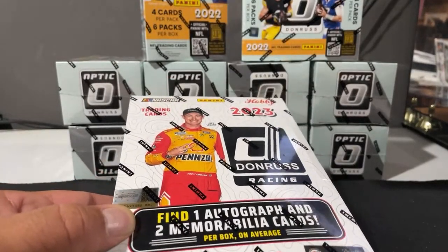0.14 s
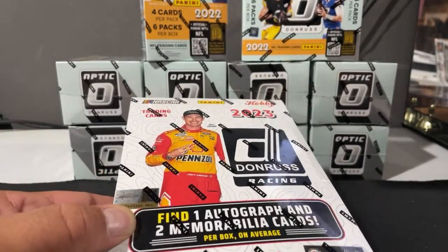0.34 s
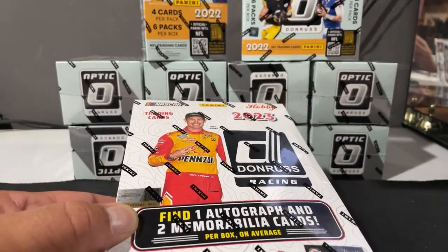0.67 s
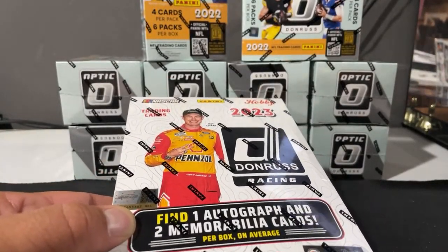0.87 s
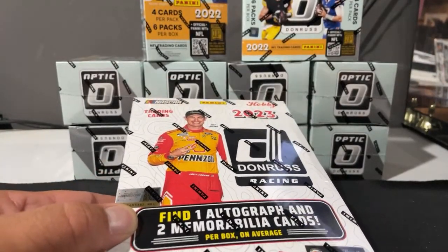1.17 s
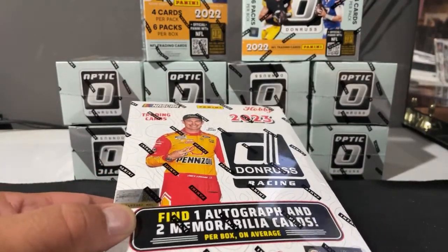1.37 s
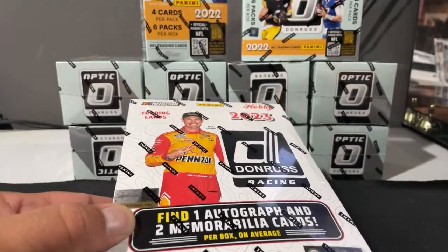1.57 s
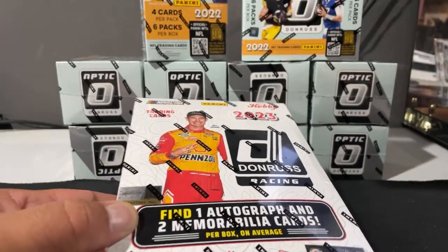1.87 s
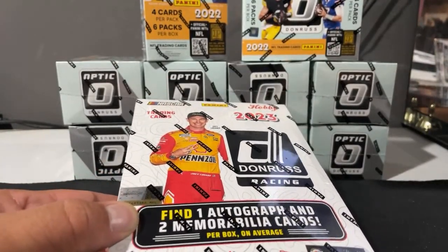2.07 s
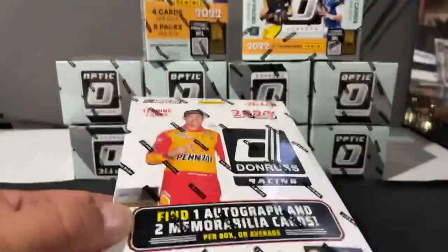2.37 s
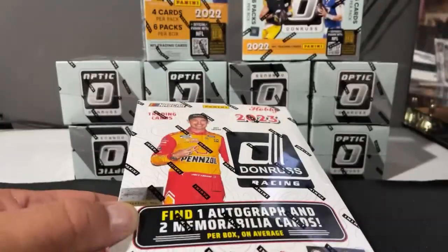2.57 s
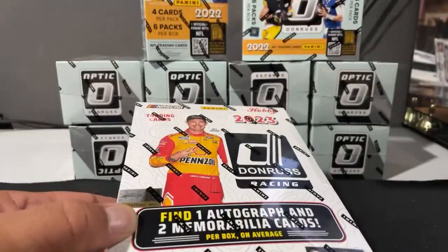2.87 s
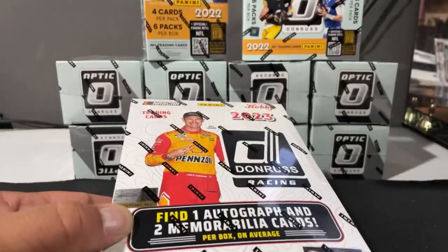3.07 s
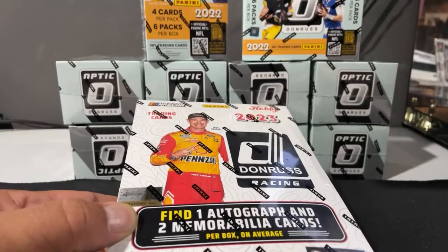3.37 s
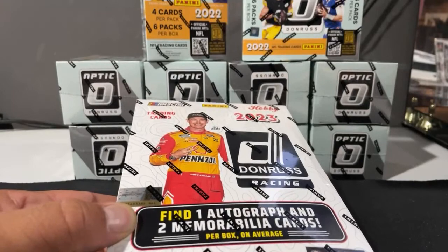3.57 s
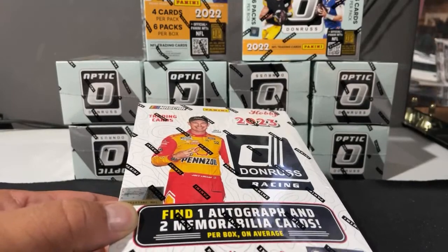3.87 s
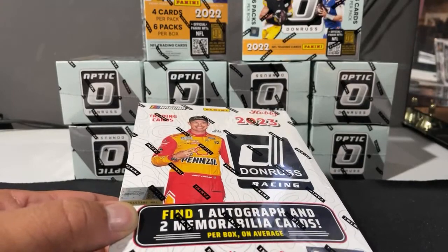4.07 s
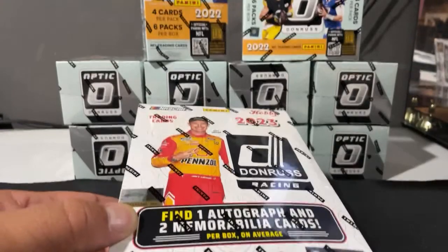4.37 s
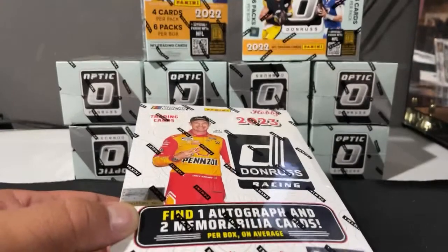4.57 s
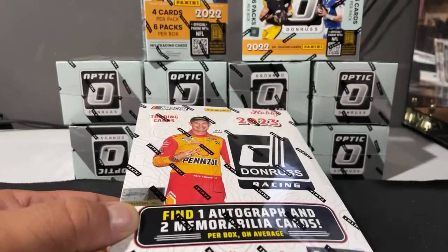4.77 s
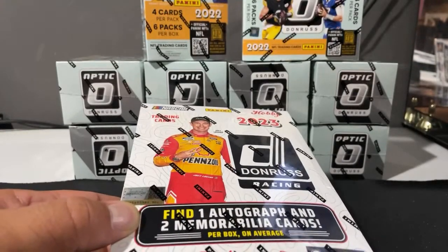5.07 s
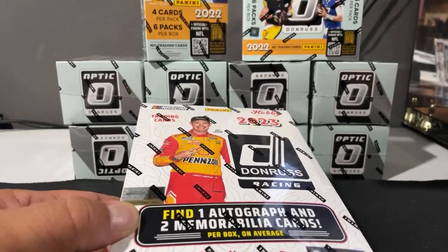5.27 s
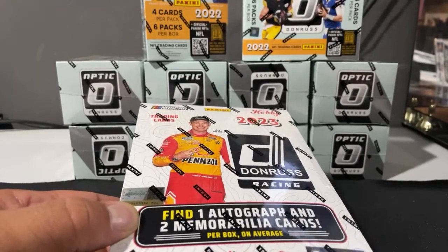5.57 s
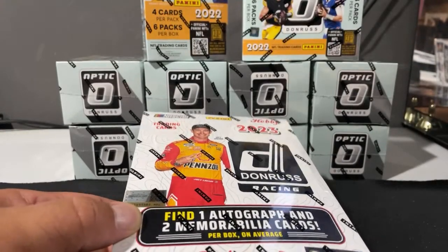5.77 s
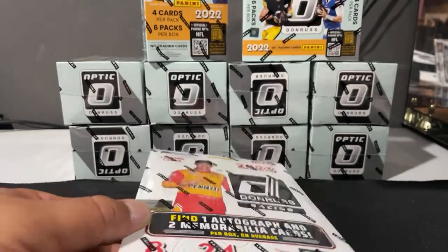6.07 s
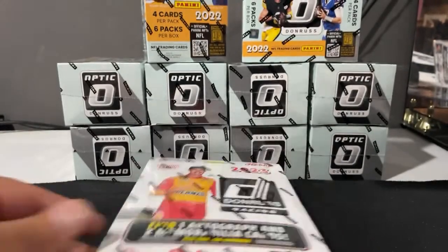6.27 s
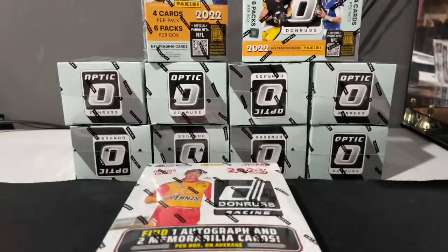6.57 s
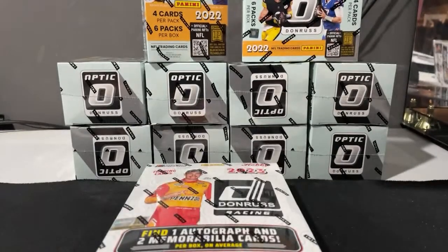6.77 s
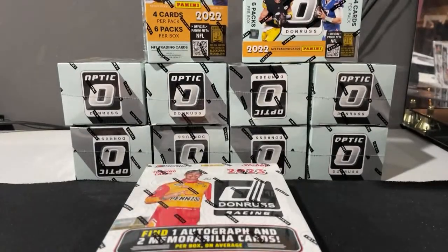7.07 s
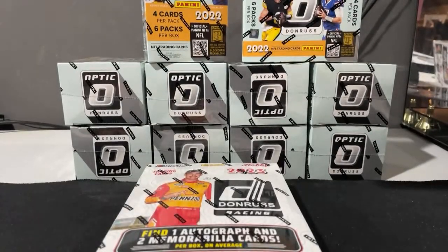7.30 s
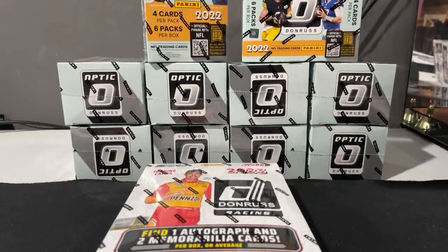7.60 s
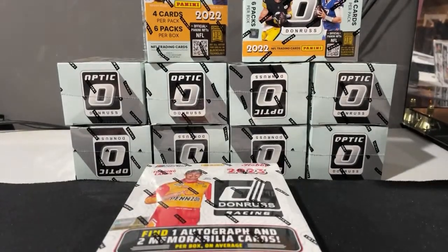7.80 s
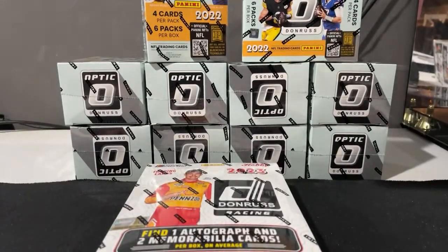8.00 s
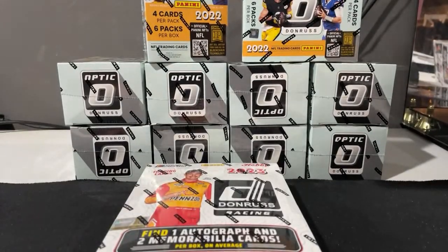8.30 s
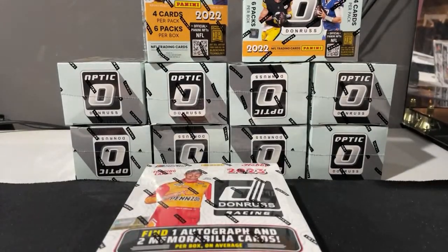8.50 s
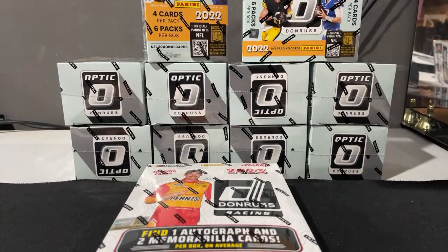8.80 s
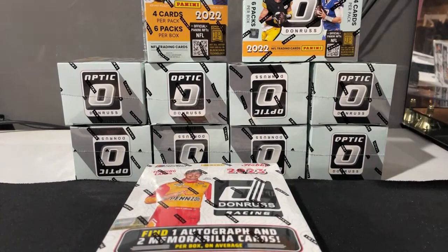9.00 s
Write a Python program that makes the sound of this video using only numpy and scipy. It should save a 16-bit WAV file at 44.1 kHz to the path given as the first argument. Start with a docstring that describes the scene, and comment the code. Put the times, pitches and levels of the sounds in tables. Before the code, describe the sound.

A hand handles a shrink-wrapped cardboard box at a desk, close to the microphone in a small, quiet room. Faint rubbing and soft knocks lead to a hard, slapping thump. Light taps and low, juddering scrapes follow, with a brief squeak. Then come two quick thumps and another about a second later. A duller bump and a few weak knocks and plastic rustles finish it.

```python
"""A hand swats at a bug on a desk, close to a phone in a small room: hard slaps and thumps, each a few
contacts in a row. Every impact excites the damped modes of the desk top and the card boxes on it,
while air squeezed from under the contact cracks. Between the blows come lighter knocks and the sounds
of friction: strokes that rub and crinkle a shrink-wrapped box, juddering drags, stick-slip squeaks.
The wrap ticks and chirps faintly; a short reverberation and quiet room noise lie behind it all."""
import sys
import numpy as np
from scipy import signal
from scipy.fft import rfft, irfft
from scipy.io import wavfile
from scipy.ndimage import uniform_filter1d

SR = 44100
rng = np.random.default_rng(int(sys.argv[2]) if len(sys.argv) > 2 else 0)


def wrap_up_sound(samples):
    """Save the sound to the file named by the first command line argument, as 16-bit audio."""
    columns = np.atleast_2d(samples).T
    # keep every value between -1 and 1, then stretch to whole-number steps
    tamed = np.clip(columns, -1, 1)
    steps = np.round(tamed * 32767).astype(np.int16)
    wavfile.write(sys.argv[1], SR, steps)


N = 403382
T = np.arange(N) / SR
HIT_T = np.arange(SR // 2) / SR  # time within one event, in seconds

# Hard contacts of hand and box on the desk. Each row: start in seconds, thump level in dB, its pitch
# in Hz, its t60 in seconds, clack level in dB, its centre in Hz, slap level in dB, its fade in seconds,
# its tilt in dB per octave, box resonance in Hz.
BLOWS = [(2.2704,-29,144,0.099,-17,760,-17.5,0.0053,0.5,3560),
         (2.278,-9.5,142.3,0.12,-12.5,340,-21.5,.015,1,3500),
         (2.334,-28,207,0.22,-33,455,-34.5,0.033,2,2830),
         (2.37,-30.5,184,.1,-22.5,427,-34.5,0.0033,4.5,2870),
         (4.204,-48,150,0.059,-19.5,370,-28,0.0043,0,3480),
         (4.213,-11.5,139.2,0.18,-25,425,-28.5,0.026,-1,1530),
         (4.238,-49.5,115,.083,-22.5,352,-37,0.0054,5,2800),
         (4.409,-39,131,0.099,-23,440,-30.5,0.021,5.5,2800),
         (4.417,-13,133,0.12,-21.5,306,-27,0.012,-3,1370),
         (4.437,-24.5,116,0.021,-34,490,-33.5,.0098,-3,2680),
         (4.456,-23.5,116,.13,-30.5,263,-41,.016,5,2700),
         (5.3733,-37.5,165,0.1,-24,364,-33,0.0063,1.5,3120),
         (5.38,-28,129,0.063,-21.5,430,-32,0.024,1.5,3160),
         (5.399,-18,157,0.13,-18.5,330,-28,0.0064,3.5,4170),
         (6.362,-28,120,0.012,-26.5,286,-40.5,.0086,3,1140),
         (6.373,-13.5,109,0.029,-31.5,288,-38,0.0063,-5.5,2450),
         (7.93,-25.5,146,.12,-27,240,-35.5,0.023,0,980),
         (7.977,-35.5,155,.11,-36.5,292,-48,0.025,-2.5,1200)]
# Soft contacts. Each row: start in seconds, thump level in dB, its pitch in Hz, clack level in dB,
# scuff level in dB.
KNOCKS = [(0.49,-48,122,-46,-66), (.896,-52,132,-47.5,-52.5), (1.036,-41.5,99.5,-39.5,-50),
          (1.068,-35,105,-43,-61), (1.137,-46,106,-49.5,-53), (1.212,-47,121,-48,-55),
          (1.656,-31,175,-38,-55.5), (1.675,-26.5,163.3,-63,-77), (2.096,-46,142,-47.5,-48.5),
          (2.51,-36,148,-38,-42), (2.539,-36.5,151.4,-75,-45.5), (2.663,-40.5,140,-45,-88.5),
          (2.752,-32.5,149,-40,-45), (2.824,-32.5,199,-45,-46), (2.888,-63,140,-41.5,-44),
          (3.006,-28.5,134,-37.5,-46), (3.098,-50,199,-39,-40), (3.147,-26.5,184,-49,-69),
          (3.181,-32,187,-45,-45.5), (3.212,-27.5,160,-54,-46.5), (3.278,-38.5,144,-48.5,-65),
          (3.496,-38,155,-41.5,-68), (3.527,-36,114,-46.5,-63), (3.579,-38.5,185,-41.5,-56),
          (3.759,-38.5,196,-48.5,-79), (4.81,-55,192.5,-49.5,-66), (4.852,-37.5,150,-48.5,-56),
          (5.714,-42.5,123,-54,-65), (6.075,-51,99,-38.5,-47), (6.087,-34.5,98.3,-39.5,-48),
          (6.113,-47,140,-56,-49), (6.818,-49,170,-45.5,-52.5), (7.272,-41,138.4,-47.5,-78.5),
          (7.429,-39.5,250.7,-42,-59), (7.638,-36.5,210.5,-35.5,-61), (7.656,-34,173,-45,-54),
          (7.831,-44,158,-42.5,-58), (8.561,-42.5,148,-43.5,-64.5), (8.583,-47,218,-41.5,-65.5)]
# Normal modes. Each row: frequency in Hz, relative level in dB, t60 (time to fall 60 dB) in seconds.
DESK_MODES = [(71, -18, 0.14), (71.9, -11, 0.41), (110.6, -12.5, 0.3), (149.3, -13, 0.42),
              (185.6, -2, 0.16), (233.5, -21.5, 0.37)]  # bending of the whole top
PANEL_MODES = [(254.9, 2.5, .17), (288.1, 4.5, .16), (346, -2.5, 0.12), (379, -4, .1), (424, -10, 0.061),
               (457.2, 2, 0.13), (498.7, 2, .12), (579, -3.5, 0.13), (675, -12, 0.15), (760, -9, 0.071),
               (900, -10, 0.1)]  # the panel and the boxes standing on it
HARD_OBJECT_MODES = [(1232, -0.5, 0.1), (1276.5, 2, .12), (1458, 2, .13), (1574, 2, .13), (2108, -4, .13),
                     (2404, 2, .07), (2950, -5.5, 0.21), (3060, -3.5, 0.056), (3390, -3, .09),
                     (3563, -3, 0.15), (4023, -8, .13), (4120, -4.5, 0.21)]  # hard things nearby
# Fingers and cardboard sliding over the box. Each row: start in seconds, length in seconds, rubbing
# level in dB, its tilt in dB per octave, wrap level in dB, its tilt in dB per octave.
STROKES = [(0.662,0.18,-39,-1.5,-50.5,-4), (.758,.037,-49,-5,-38,-3), (0.923,0.076,-40.5,-1.5,-54,-2),
           (1.151,0.12,-49.5,-2.5,-57.5,-6), (1.738,0.17,-46,-8.5,-72,-3), (2.089,0.071,-43,-4,-53.5,-2),
           (2.251,0.12,-25,1.5,-37.5,-2), (2.519,0.065,-45,2.5,-43,-4), (2.743,0.11,-37.5,1,-47,1),
           (2.838,0.049,-33,4,-41.5,-1), (2.913,0.086,-42.5,2.5,-46,-1.5), (3.058,0.16,-41.5,3,-42.5,3),
           (3.327,0.056,-30,5,-43.5,0), (3.364,0.14,-43.5,4,-64,-19), (3.957,0.09,-39,-2.5,-85,1),
           (4.025,.045,-38.5,3,-49.5,0), (4.148,0.073,-52,7,-55.5,-3), (4.245,0.45,-47.5,7,-64,-8),
           (4.383,.15,-34.5,3.5,-40,2), (4.802,0.094,-49,2.5,-60.5,4), (4.887,0.052,-46.5,7.5,-46.5,2),
           (5.129,.16,-41,4.5,-45.5,-1), (5.444,0.1,-45,4,-54,0), (5.568,0.026,-45.5,6.5,-48,1),
           (6.072,0.17,-44.5,0.5,-44,0), (6.591,0.15,-42,8,-40,1), (7.163,0.14,-52,-1.5,-59.5,-3),
           (7.444,0.16,-51,-2.5,-59,0), (7.61,.07,-51,-3,-48,-4.5), (7.863,0.076,-39.5,3,-44,-8),
           (7.961,0.049,-33.5,-1,-49,1), (8.033,0.068,-44,3.5,-50,-7.5), (8.466,.1,-51,-1,-64.5,-6.5)]
# Quiet rustle between strokes. Each row: time in seconds, rubbing level in dB, wrap level in dB.
RUSTLE_LEVELS = [(.32,-67,-80), (.4,-60.5,-62), (1.3,-60.5,-70), (1.9,-56.5,-61.5), (2.7,-58.5,-67),
                 (3.1,-53,-57.5), (3.55,-57.5,-66), (3.9,-65.5,-60), (4.13,-63,-78), (4.55,-65.5,-56),
                 (4.77,-74,-77), (5.08,-85,-81), (5.25,-65,-71), (5.95,-71,-64.5), (6.2,-59.5,-57),
                 (6.75,-56.5,-52), (6.95,-68,-76), (8.05,-58,-79), (8.3,-68.5,-83), (8.76,-79,-87),
                 (8.86,-63.5,-64.5), (9.1,-84,-61)]
# Drags over the desk. Each row: start in seconds, end in seconds, level in dB.
DRAGS = [(2.41, 2.524, -35), (3.055, 3.257, -26), (3.458, 3.606, -34), (4.21, 4.432, -26)]
# Squeaks and rasps. Each row: start in seconds, length in seconds, pitch in Hz, width in Hz, level in dB.
SQUEAKS = [(0.0,0.45,1120,202,-68.5), (0.763,0.05,3430,394,-51), (0.768,.034,5210,900,-50),
           (0.916,0.039,1200,510,-52), (3.092,0.024,1420,294,-27.5), (3.27,0.024,710,237,-45),
           (3.363,0.11,1060,126,-54.5), (3.674,0.027,1440,323,-45), (4.242,0.24,3070,450,-63),
           (4.4,0.024,2750,513,-32), (5.745,.05,1346,305,-58), (6.489,0.049,1550,195,-56),
           (6.599,.11,2460,242,-49), (7.58,0.068,2380,600,-59)]
# Chirps of the wrap. Each row: start in seconds, level in dB before random scatter.
CHIRPS = [(1.676,-67), (1.905,-68), (1.992,-60), (2.57,-67), (2.637,-63), (2.674,-66)]
# Resonances of the taut film. Each row: frequency in Hz, relative level in dB.
FILM_MODES = [(13170,1), (15550,-7)]
# Spectral envelopes of the noises. Each row: frequency in Hz, relative spectral density in dB.
RATTLE_SPECTRUM = [(120, -20.5), (250, -3), (450, -6), (700, -9.5), (1200, -14), (2000, -29.5),
                   (5000, -63.5)]
SLAP_SPECTRUM = [(500, -22.5), (800, -1), (1250, 3.5), (2000, -2), (3400, -1.5), (4600, -8.5), (7000, -12),
                 (10000, -17), (13000, -26.5), (15500, -22.5)]
SCUFF_SPECTRUM = [(500, -21), (1200, 5), (2000, 2), (3400, -12), (5000, -12.5), (8000, -21.5), (13000, -24),
                  (15500, -28.5)]
RUB_SPECTRUM = [(150, -11.5), (400, 10), (750, 4.5), (1200, 1), (1800, 1), (2500, -12), (4000, -18.5),
                (9000, -52)]
WRAP_SPECTRUM = [(1200, -21), (2200, 0), (3500, -2), (5500, -3.5), (8000, -8), (10000, -6.5),
                 (13000, -17.5), (15500, -9)]
RUMBLE_SPECTRUM = [(25, -45.5), (50, -10), (75, 5), (130, 2), (220, 2.5), (350, -9), (600, -27),
                   (1500, -58)]
JUDDER_SPECTRUM = [(60, -20), (130, 11.5), (190, 4.5), (300, -3.5), (450, -2.5), (700, -26.5), (1500, -26),
                   (3000, -109)]
AIR_SPECTRUM = [(15, -36.5), (25, -36.5), (59, -4), (107, 13), (204, -10), (614, -27.5), (1240, -17.5),
                (2850, -38), (3830, -30.5), (7700, -49.5), (15500, -53.5)]
# Reverberation time of the room. Each row: frequency in Hz, t60 in seconds.
ROOM_DECAY = [(70, 0.4), (250, 0.17), (1000, 0.12), (4000, 0.15), (15000, 0.11)]


def blows(rise_share=0.13):
    """Impact excitation: each hard contact gives a deep thump, a clack and a sharp slap."""
    out = np.zeros(N)
    for start, thump_db, thump_hz, t60, clack_db, clack_hz, slap_db, fade_s, tilt, box_hz in BLOWS:
        add(out, start, undb(thump_db) * thump(thump_hz, t60, desk_db=-6, rise_s=0.0036))
        add(out, start, undb(clack_db) * clack(clack_hz, octaves=0.26, rattle_db=-5, rattle_s=0.013))
        crack = slap(tilted(SLAP_SPECTRUM, tilt), rise_share * fade_s, fade_s, ring_db=-8, box_hz=box_hz)
        add(out, start, undb(slap_db) * crack)
    return out


def thump(hz, spot_t60, desk_db, rise_s):
    """Coupled vibration: the longer the struck spot swings, the more it drives the whole desk top."""
    top = modal_sum(DESK_MODES)
    coupling = undb(desk_db) * (spot_t60 / 0.12) ** 2
    onset = 1 - np.exp(-HIT_T / rise_s)
    return onset_unit((ring(hz, spot_t60) + coupling * top) * onset)


def clack(hz, octaves, rattle_db, rattle_s, detune=0.0098):
    """Modal superposition: each spot excites its own mix of panel modes near hz; cardboard rattles."""
    draws = rng.standard_normal((len(PANEL_MODES), 2))
    modes = 0
    for (mode_hz, db, t60), (polarity, offset) in zip(PANEL_MODES, draws):
        weight = np.sign(polarity) * undb(db) / (1 + (np.log2(mode_hz / hz) / octaves) ** 2)
        modes += weight * ring(mode_hz * (1 + detune * offset), t60)
    rattle = onset_unit(colour(burst(0.0012, rattle_s), RATTLE_SPECTRUM))
    return onset_unit(onset_unit(modes) + undb(rattle_db) * rattle)


def slap(spectrum, rise_s, fade_s, ring_db, box_hz, box_db=2, crunch_db=3):
    """Broadband transient: expelled air cracks, the wrap crunches, the box resonates, hard things ring."""
    signs = np.sign(rng.standard_normal(len(HARD_OBJECT_MODES)))
    modes = sum(sign * undb(db) * ring(hz, t60) for (hz, db, t60), sign in zip(HARD_OBJECT_MODES, signs))
    crunch = undb(crunch_db * drift(1000, len(HIT_T)))
    crack = colour(burst(rise_s, fade_s) * crunch, spectrum)
    box = undb(box_db) * resonate(crack, box_hz, width_hz=0.17 * box_hz, order=1)
    return onset_unit(onset_unit(crack + box) + undb(ring_db) * onset_unit(modes))


def knocks():
    """Soft impact: the force builds more slowly, so the thump swells and the scuff is duller."""
    out = np.zeros(N)
    for start, thump_db, thump_hz, clack_db, scuff_db in KNOCKS:
        add(out, start, undb(thump_db) * thump(thump_hz, spot_t60=0.11, desk_db=-4, rise_s=0.009))
        add(out, start, undb(clack_db) * clack(hz=330, octaves=0.2, rattle_db=-2.5, rattle_s=0.027))
        scuff = slap(SCUFF_SPECTRUM, rise_s=0.002, fade_s=0.011, ring_db=-10.5, box_hz=3660)
        add(out, start, undb(scuff_db) * scuff)
    return out


def handling(rumble_rest_db=-57.5, rumble_coupling_db=-6):
    """Sliding friction: cardboard rubs, the wrap hisses, and the desk rumbles more under each push."""
    rub_db, wrap_db = rustle_levels()
    push = undb(rub_db)
    out = push * rub(N, tilt=0) + undb(wrap_db) * wrap(N, tilt=0)
    for start, length, rub_db, rub_tilt, wrap_db, wrap_tilt in STROKES:
        slide = stroke(length)
        rubbing = undb(rub_db) * rub(len(slide), rub_tilt)
        crinkle = undb(wrap_db) * wrap(len(slide), wrap_tilt)
        add(out, start, slide * (rubbing + crinkle))
        add(push, start, undb(rub_db) * slide)
    slips = friction(slips_per_s=110, spread_db=2.5, slip_db=-6.5, flicker_db=-2.5)
    rumble = unit(colour(slips, RUMBLE_SPECTRUM))
    return out + (undb(rumble_rest_db) + undb(rumble_coupling_db) * push) * rumble


def stroke(length, attack_share=0.32, sag_db=12, release_s=0.014):
    """Amplitude envelope of a slide: it speeds up, slackens while it lasts and dies away."""
    attack = np.minimum(HIT_T / (attack_share * length), 1)
    sag = undb(-sag_db * np.minimum(HIT_T / length, 1))
    release = np.exp(-np.maximum(HIT_T - length, 0) / release_s)
    return attack * sag * release


def rub(n, tilt, ring_db=-13):
    """Forced vibration: the friction of skin and cardboard makes hard things nearby ring faintly."""
    slips = friction(slips_per_s=400, spread_db=1.2, slip_db=-8, flicker_db=4, n=n)
    rubbing = unit(colour(slips, tilted(RUB_SPECTRUM, tilt)))
    return unit(rubbing + undb(ring_db) * respond(rubbing, modal_sum(HARD_OBJECT_MODES)))


def wrap(n, tilt, film_swing_db=3, crease_swing_db=4):
    """Membrane resonance: film and creases colour the wrap's hiss more or less as the tension varies."""
    slips = friction(slips_per_s=270, spread_db=2.3, slip_db=-8.5, flicker_db=2, n=n)
    hiss = colour(slips, tilted(WRAP_SPECTRUM, tilt))
    film = (undb(film_swing_db * drift(15, n)) - 1) * resonate(hiss, hz=3600, width_hz=1400)
    creases = (undb(crease_swing_db * drift(25, n)) - 1) * resonate(hiss, hz=8000, width_hz=1100)
    return unit(hiss + film + creases)


def friction(slips_per_s, spread_db, slip_db, flicker_db, n=N):
    """Shot noise: tiny slips of unequal size over a smooth hiss, under a wavering pressure."""
    slips = (rng.random(n) < slips_per_s / SR) * rng.standard_normal(n)
    sizes = undb(spread_db * np.minimum(rng.exponential(size=n), 2))
    hiss = rng.standard_normal(n)
    pressure = undb(flicker_db * drift(60, n))
    return (hiss + undb(slip_db) * unit(slips * sizes)) * pressure


def dragging(edge_s=0.066, rumble_db=-27):
    """Friction-driven vibration: coarse slips shake the desk top for as long as the push lasts."""
    push = sum(undb(db) * np.clip(np.minimum(T - start, end - T) / edge_s, 0, 1)
               for start, end, db in DRAGS)
    slips = friction(slips_per_s=410, spread_db=0.38, slip_db=0.7, flicker_db=1.5)
    judder = unit(colour(slips, JUDDER_SPECTRUM))
    rumble = unit(colour(rng.standard_normal(N), RUMBLE_SPECTRUM))
    return push * (judder + undb(rumble_db) * rumble)


def squeaks(grip_db=3):
    """Stick-slip oscillation: a rough tone whose pitch and strength jump about with the grip."""
    out = np.zeros(N)
    for start, length, hz, width_hz, db in SQUEAKS:
        n = int(length * SR)
        pitch = hz + width_hz / 2 * drift(2 * width_hz, len(HIT_T))
        grip = undb(grip_db * drift(width_hz, len(HIT_T)))
        rasp = np.sin(2 * np.pi * np.cumsum(pitch) / SR) * grip
        add(out, start, undb(db) * unit(np.hanning(n) * rasp[:n]))
    return out


def chirps(width_hz=230, rise_s=0.0051, fade_s=0.018, scatter_db=2, flicker_db=2.3):
    """Narrow resonances: taut plastic gives thin, very high chirps, in a new mix each time."""
    out = np.zeros(N)
    for start, db in CHIRPS:
        chirp = 0
        for hz, mode_db in FILM_MODES:
            mode = onset_unit(resonate(burst(rise_s, fade_s), hz, width_hz))
            chirp += undb(mode_db + scatter_db * rng.standard_normal()) * mode
        add(out, start, chirp * undb(db + flicker_db * drift(100, len(HIT_T))))
    return out


def ticks(per_s=10, relative_db=-6, spread_db=3):
    """Poisson process: the wrap ticks at random under the fingers, louder where it rustles more."""
    _, wrap_db = rustle_levels()
    onsets = rng.random(N) < per_s / SR
    strength = undb(wrap_db + relative_db + spread_db * rng.standard_normal(N))
    tick = onset_unit(colour(burst(rise_s=0.00087, fade_s=0.018), SCUFF_SPECTRUM))
    return signal.fftconvolve(onsets * strength, tick)[:N]


def rustle_levels():
    """Linear interpolation of the quiet rustle: a rubbing track and a wrap track, both in dB."""
    times, *columns = np.transpose(RUSTLE_LEVELS)
    return [np.interp(T, times, db) for db in columns]


def room(x, wet_db, build_s=0.0033):
    """Reverberation: diffuse reflections decay octave by octave, and the bass lasts longest."""
    n = len(HIT_T)
    noise, hz = rfft(rng.standard_normal(n)), np.arange(n // 2 + 1) * SR / n
    edges = np.append(0, SR / 2 ** np.arange(9, 0, -1))
    tail = sum(irfft(noise * ((hz >= lo) & (hz < hi)), n) * decay(along(ROOM_DECAY, (lo + hi) / 2))
               for lo, hi in zip(edges, edges[1:]))
    build_up = 1 - np.exp(-(HIT_T / build_s) ** 2)
    return x + undb(wet_db) * respond(x, tail * build_up)


def room_air(db=-60.5):
    """Stationary noise: the quiet air of the room, strongest in the bass."""
    return undb(db) * unit(colour(rng.standard_normal(N), AIR_SPECTRUM))


def decay(t60):
    """Exponential damping, by 60 dB in t60 seconds."""
    return np.exp(-np.log(1000) * HIT_T / t60)


def ring(hz, t60):
    """Free vibration of one damped mode."""
    return np.sin(2 * np.pi * hz * HIT_T) * decay(t60)


def modal_sum(modes):
    """Superposition of modes struck together."""
    return sum(undb(db) * ring(hz, t60) for hz, db, t60 in modes)


def burst(rise_s, fade_s):
    """Noise transient with an exponential rise and decay."""
    return rng.standard_normal(len(HIT_T)) * (1 - np.exp(-HIT_T / rise_s)) * np.exp(-HIT_T / fade_s)


def drift(rate_hz, n=N):
    """Smooth random modulation with rms 1."""
    step = int(SR / rate_hz)
    stairs = np.repeat(rng.standard_normal(n // step + 1), step)
    return unit(uniform_filter1d(stairs, step)[:n])


def respond(x, impulse_response):
    """Convolution with an impulse response scaled to unit energy."""
    return signal.fftconvolve(x, impulse_response / np.linalg.norm(impulse_response))[:len(x)]


def resonate(x, hz, width_hz, order=2):
    """Band-pass resonance; a higher order has steeper skirts."""
    edges = [max(hz - width_hz / 2, 20), hz + width_hz / 2]
    return signal.sosfilt(signal.butter(order, edges, "band", fs=SR, output="sos"), x)


def colour(x, spectrum, size=4096):
    """Minimum-phase filter with the given spectrum, built by folding its cepstrum."""
    hz = np.arange(size // 2 + 1) * SR / size
    cepstrum = irfft(np.log(undb(along(spectrum, hz))))
    cepstrum[1:size // 2] *= 2
    cepstrum[size // 2 + 1:] = 0
    return signal.fftconvolve(x, irfft(np.exp(rfft(cepstrum))))[:len(x)]


def tilted(spectrum, db_per_octave):
    """Spectral tilt: a positive slope brightens, a negative one dulls."""
    return [(hz, db + db_per_octave * np.log2(hz / spectrum[0][0])) for hz, db in spectrum]


def along(points, hz):
    """Interpolation of (Hz, value) points on a log-frequency axis."""
    point_hz, values = np.transpose(points)
    return np.interp(np.log(np.maximum(hz, 1)), np.log(point_hz), values)


def undb(db):
    """Decibels to amplitude ratio."""
    return 10 ** (np.asarray(db) / 20)


def unit(x):
    """Normalisation to rms 1."""
    return x / np.sqrt(np.mean(x ** 2))


def onset_unit(x):
    """Normalisation of a hit to rms 1 over its first 30 ms."""
    return x / np.sqrt(np.mean(x[:SR * 3 // 100] ** 2))


def add(out, start_s, x):
    """Superposition of x onto out from start_s."""
    i = max(int(start_s * SR), 0)
    out[i:i + len(x)] += x[:len(out) - i]


def scene():
    """Superposition: everything on the desk sounds in the room, over its quiet air."""
    air = room_air()
    desk = blows() + knocks() + handling() + dragging() + squeaks() + chirps() + ticks()
    return (room(desk, wet_db=-13) + air)[None]


def record(dry, low_cut_hz=57, high_cut_hz=15900):
    """Band limiting and saturation: the phone drops the deepest bass, rounds peaks and cuts the top."""
    x = signal.sosfilt(signal.butter(6, low_cut_hz, "high", fs=SR, output="sos"), dry)
    rounded = x / (1 + x ** 6) ** (1 / 6)
    return signal.sosfilt(signal.ellip(10, 0.2, 80, high_cut_hz, fs=SR, output="sos"), rounded)


dry = scene()
out = record(dry)
wrap_up_sound(out)
```